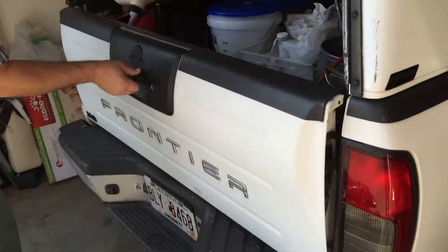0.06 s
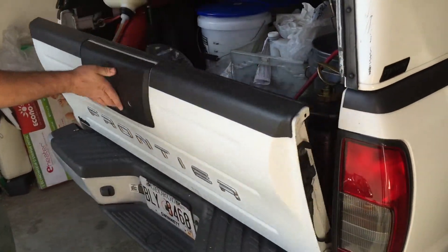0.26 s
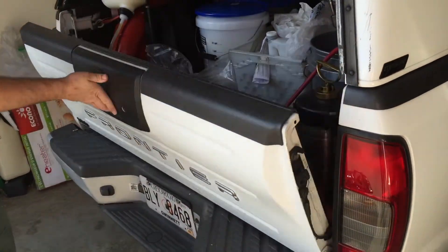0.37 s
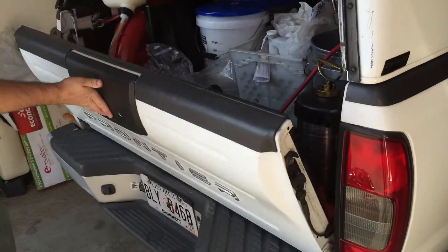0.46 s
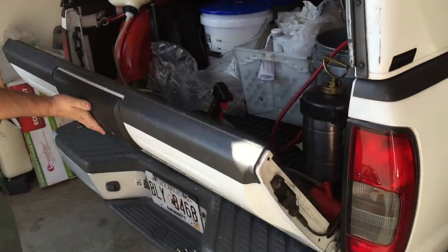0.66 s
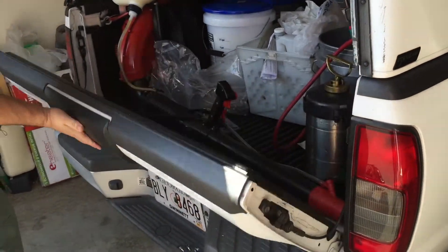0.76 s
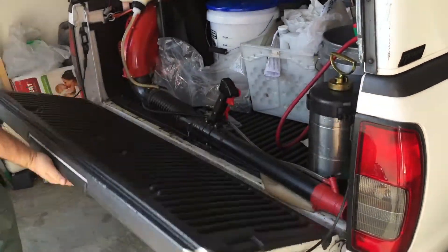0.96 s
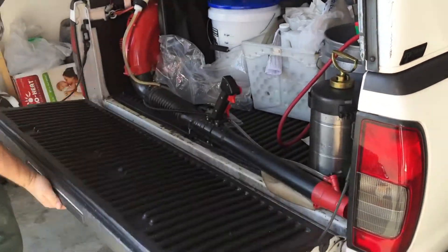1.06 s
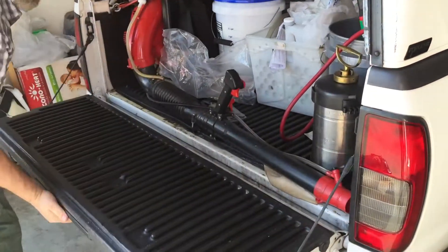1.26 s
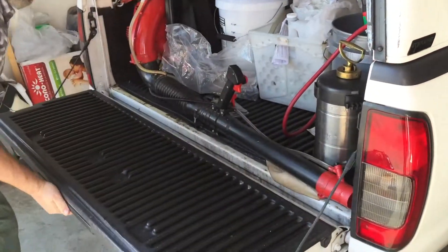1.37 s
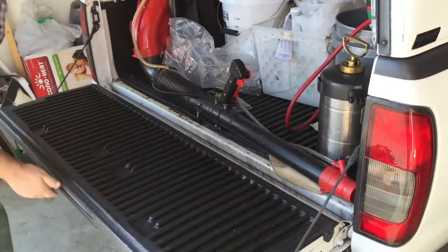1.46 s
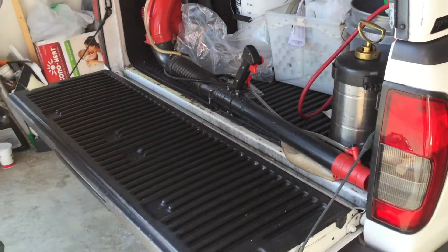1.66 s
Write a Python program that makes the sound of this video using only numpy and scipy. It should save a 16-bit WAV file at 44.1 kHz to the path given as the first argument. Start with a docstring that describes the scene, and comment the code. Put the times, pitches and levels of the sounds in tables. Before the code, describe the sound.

A pickup tailgate opens close by in a quiet garage. Soft handle clicks lead to a sharp steel latch snap at 0.2 seconds, followed by a brief hollow ring. The gate swings down with a very faint hiss. At about 1.2 seconds it lands with a heavy, hollow double clunk, loose parts rattling as it bounces. Smaller knocks die away by about 1.6 seconds.

```python
"""Opening a pickup's tailgate

Close by in a garage, the handle pulls its rods, the steel latch snaps open and the freed gate shudders.
It swings down with a faint hiss and lands on its cables with a double clunk: the hollow panel
booms and bounces, loose parts rattle, the cable ends tick and the truck rocks on its springs."""
import sys
import numpy as np
from scipy import signal
from scipy.fft import rfft, irfft
from scipy.io import wavfile

SR = 44100
rng = np.random.default_rng(int(sys.argv[2]) if len(sys.argv) > 2 else 0)


def transcribe(signal):
    """Save signal, clipped to [-1, 1], as a 16-bit WAV file at the path in sys.argv[1]."""
    frames = np.atleast_2d(signal).T
    limited = np.clip(frames, -1, 1)
    pcm = np.round(limited * 32767).astype(np.int16)
    wavfile.write(sys.argv[1], SR, pcm)


N = 74970
T = np.arange(N) / SR

# Levels are relative. A "colour" says how strong each pitch is in a noise. A "fade" is the time
# to die away by 60 dB. A "tilt" makes a sound brighter (+) or duller (-).

# the gate lands and bounces: t/s, boom level/dB, tilt of the panel's notes/dB per octave, rattle level/dB
GATE_BLOWS = [(1.124, -50, 2, -17.5), (1.1768, 4, -2.5, 0), (1.1978, 0.5, -7.5, 1), (1.2146, -9, 9, -8),
              (1.2668, -6.5, 0.5, -11.5), (1.297, -10, 2, -11), (1.32, -16, -4.5, -14.5),
              (1.343, -19, -14.5, -30), (1.462, -25.5, -2, -30), (1.581, -43.5, -4, -29)]
# notes of the hollow steel panel: f/Hz, level/dB, fade/s
PANEL_NOTES = [(123, -36, .28), (138, -30, .3), (187, -19, .22), (204, -32, .24), (234, -35, .24),
               (264, -27, .27), (312, -28, .25), (367, -27, .24), (396, -32, .24), (432, -29, .26),
               (472, -31, .24), (518, -31, .19), (541, -31, .2)]
# the panel's low rumble: f/Hz, level/dB
RUMBLE_COLOUR = [(30, -29), (70, -17), (105, -11.5), (170, -2), (300, -2), (520, -8.5), (650, -27),
                 (800, -26.5), (1200, -25), (3000, -42)]
# how long it rumbles: f/Hz, fade/s
RUMBLE_FADE = [(60, 0.16), (200, 0.21), (700, 0.04)]
# loose parts inside the gate: f/Hz, level/dB
RATTLE_COLOUR = [(200, -22), (600, 11), (720, 6.5), (870, 2), (1300, 5), (1900, -1.5), (3000, -2),
                 (5000, -11.5), (10000, -11), (13000, -21), (15000, -23)]
# how long they rattle: f/Hz, fade/s
RATTLE_FADE = [(500, 0.15), (2000, .17), (6000, 0.28), (13000, 0.21)]
def gate_landing():
    """Each blow rattles the loose parts; a moment later the hollow panel gives way and booms."""
    give_way = 1 - np.exp(-T / .0012)
    boom_lag_s, out = 0.0023, 0
    for start, boom_db, tilt, rattle_db in GATE_BLOWS:
        rattle = amp(-34.5) * burst(RATTLE_COLOUR, RATTLE_FADE, echo_db=-4)
        notes = amp(-6) * give_way * ring(PANEL_NOTES, thud=True, tilt_db=tilt)
        rumble = amp(-29.5) * burst(RUMBLE_COLOUR, RUMBLE_FADE, echo_db=-6)
        out += amp(rattle_db) * at(start, rattle)
        out += amp(boom_db) * at(start + boom_lag_s, notes + rumble)
    return low_cut(out, hz=159, order=3)


# clicks of the handle and latch: t/s, level/dB, tilt of the crack/dB per octave
LATCH_CLICKS = [(0.145, -38, 2), (0.1522, -25, 2), (0.173, -27, -3), (0.218, -28.5, -3), (0.2248, 1, 1)]
# notes of the steel latch parts: f/Hz, level/dB, fade/s
LATCH_NOTES = [(880, -24, .13), (1222, -25, .14), (2804, -25, .12), (2884, -21, .13), (3205, -20, .13),
               (3463, -20, .13), (4226, -26, .12), (4458, -30, .14), (4925, -22, .11), (6748, -23, .1),
               (7420, -26, .1), (7815, -27, .12), (8399, -27, .12), (9346, -23, .11), (10200, -24, .09),
               (11635, -32, .12)]
# the noisy crack of a click: f/Hz, level/dB
CRACK_COLOUR = [(110, -11), (250, 1.5), (600, -1), (720, -3.5), (1000, 1.5), (1250, -1), (1900, -4.5),
                (2400, -6), (3100, 1), (4000, -4), (5800, -5.5), (7000, -3.5), (9000, -4), (11000, -3),
                (12500, -13.5), (15000, -9)]
# how long it lasts: f/Hz, fade/s
CRACK_FADE = [(200, .12), (1000, 0.13), (3000, 0.062), (12000, .05)]
def latch():
    """Each click cracks and rings the steel parts, which give off no bass; soft clicks are duller."""
    notes = amp(-7.5) * ring(LATCH_NOTES)
    treble_cut = signal.butter(8, 11400, fs=SR, output="sos")
    soft_below_db, out = -12, 0
    for start, db, tilt in LATCH_CLICKS:
        crack = amp(-15.5) * burst(CRACK_COLOUR, CRACK_FADE, echo_db=-11.5, tilt_db=tilt)
        click = at(start, notes + crack)
        if db < soft_below_db:
            click = signal.sosfilt(treble_cut, click)
        out += amp(db) * click
    return low_cut(out, hz=180, order=3)


# notes of the gate's shaking skin: f/Hz, level/dB, fade/s
SHUDDER_NOTES = [(162.4, -53.5, 1), (212, -43, .55), (258, -29.5, 0.24), (297, -44.5, 0.99),
                 (344, -38.5, 0.53), (428, -31.5, 0.35)]
def shudder():
    """The freed gate jumps off its stops, and a hollow ring swells just after the latch lets go."""
    swell = 1 - np.exp(-T / 0.015)
    return at(.24, amp(-3.5) * swell * ring(SHUDDER_NOTES))


# ticks of the cable ends: t/s, level/dB, tilt/dB per octave
CABLE_TICKS = [(1.1737, -52, 3), (1.196, -35, -2), (1.201, -29.5, -3), (1.298, -48, 2.5)]
# one bright tick: f/Hz, level/dB
TICK_COLOUR = [(1000, -22), (3500, -8.5), (7000, 3.5), (11000, -1), (12500, -1.5), (15000, -11)]
# how long it lasts: f/Hz, fade/s
TICK_FADE = [(1000, 0.04), (12000, 0.069)]
def cable_ticks():
    """The cable ends give short, bright ticks as they catch the gate."""
    return sum(at(start, amp(db) * burst(TICK_COLOUR, TICK_FADE, echo_db=-25, tilt_db=tilt))
               for start, db, tilt in CABLE_TICKS)


# how loudly the rods and cables scrape: t/s, level/dB
SCRAPE_LOUDNESS = [(0.145, -65.5), (0.156, -48.5), (0.175, -47), (0.187, -46.5), (0.2, -41.5), (0.218, -42),
                   (0.235, -72), (0.26, -95.5), (1.1, -66), (1.135, -71), (1.158, -52), (1.18, -45),
                   (1.22, -90)]
# their dull tone: f/Hz, level/dB
SCRAPE_COLOUR = [(80, -39.5), (180, -4), (290, 7), (480, 3), (700, -6.5), (1200, -7.5), (2000, -28.5),
                 (6000, -32.5)]
def scrape():
    """The handle's rods scrape, and later the cables do as they pull tight."""
    return loudness(SCRAPE_LOUDNESS) * noise(SCRAPE_COLOUR)


# how strongly the truck rocks: t/s, level/dB
ROCK_LOUDNESS = [(1.12, -95), (1.18, -64.5), (1.255, -62), (1.285, -50), (1.35, -60), (1.42, -81),
                 (1.5, -81)]
# its deep tone: f/Hz, level/dB
ROCK_COLOUR = [(15, -5), (30, -3.5), (55, 4), (90, -11.5), (200, -40)]
def truck_rocking():
    """The truck rocks on its springs with a deep rumble as the gate lands."""
    return loudness(ROCK_LOUDNESS) * noise(ROCK_COLOUR)


# rise and fall of the swing's hiss: t/s, level/dB
HISS_LOUDNESS = [(0, -68), (.55, -71), (.75, -72), (.92, -63), (1.11, -60), (1.28, -74), (1.43, -63),
                 (1.53, -67), (1.63, -63), (1.7, -69)]
# its bright tone: f/Hz, level/dB
HISS_COLOUR = [(500, -3.5), (2500, -4.5), (5000, -4), (9500, 4.5), (13000, -2), (15000, 0)]
def swing_hiss():
    """A faint hiss grows as the gate swings."""
    return loudness(HISS_LOUDNESS) * noise(HISS_COLOUR)


# rise and fall of the mid-pitched hiss: t/s, level/dB
MID_HISS_LOUDNESS = [(.6, -86.5), (.83, -71), (.93, -69.5), (1.02, -89), (1.15, -106)]
# its tone: f/Hz, level/dB
MID_HISS_COLOUR = [(800, -19.5), (1800, -0.5), (2800, -2), (4500, -10.5), (9000, -18)]
def swing_mid_hiss():
    """A soft mid-pitched hiss swells and fades midway through the swing."""
    return loudness(MID_HISS_LOUDNESS) * noise(MID_HISS_COLOUR)


# the garage's air: f/Hz, level/dB
AIR_COLOUR = [(25, -22.5), (50, -16), (90, -4.5), (160, 1.5), (300, 0), (600, -6), (1200, -7.5),
              (2500, -19.5), (6000, -23.5), (15000, -34.5)]
def garage_air():
    """The air makes a low, steady hush."""
    return amp(-64) * noise(AIR_COLOUR)


# how long the garage echoes: f/Hz, fade/s
ECHO_FADE = [(100, 0.61), (300, 0.44), (1000, 0.42), (3500, 0.43), (7000, 0.33), (13000, 0.24)]
def garage_echo(t, hz, db):
    """Strength of the echo at one pitch: it builds quickly, dies away, and is weaker in the treble."""
    build_up = 1 - np.exp(-t / 0.016)
    tilt_db = -2.33 * np.log2(hz / 2000)
    return build_up * amp(db + tilt_db - 60 * t / at_hz(ECHO_FADE, hz))


def burst(colour, fades, echo_db, tilt_db=0):
    """Countless close notes struck at once: each band of pitches fades at its own rate and echoes."""
    t = T[:2 ** 15]
    hz = np.fft.rfftfreq(len(t), 1 / SR)
    edges = np.append(20, np.geomspace(100, 17000, 23))
    gain = amp(at_hz(colour, hz))
    spectrum, out = gain * rfft(rng.standard_normal(len(t))), 0
    for low, high in zip(edges, edges[1:]):
        inside, middle = (hz >= low) & (hz < high), np.sqrt(low * high)
        band = np.fft.ifft(spectrum * inside, len(t))
        band = band.real / (np.abs(band) + band.std() / 2)  # even out the random flutter
        share = np.sqrt(np.sum(gain[inside] ** 2) / np.sum(gain ** 2))
        tilt = amp(tilt_db * np.log2(middle / 2000))
        direct = amp(-60 * t / at_hz(fades, middle))
        echo = garage_echo(t, middle, echo_db)
        out += band / band.std() * share * tilt * np.hypot(direct, echo)
    return at(0, out)


def ring(notes, thud=False, tilt_db=0):
    """Fading notes of a struck object; if all start by pushing the same way, they open with a thud."""
    out = 0
    for k, (hz, db, fade) in enumerate(notes):
        direction = 1 if thud else (-1) ** k
        start_db = db + tilt_db * np.log2(hz / 253)  # tilt around the panel's middle pitch
        out += direction * np.sin(2 * np.pi * hz * T) * amp(start_db - 60 * T / fade)
    return out


def noise(colour):
    """Steady noise of a given colour, with a typical size of 1."""
    gain = amp(at_hz(colour, np.fft.rfftfreq(N, 1 / SR)))
    x = irfft(rfft(rng.standard_normal(N)) * gain, N)
    return x / x.std()


def amp(db):
    """Turn decibels into a number to multiply by."""
    return 10 ** (np.asarray(db) / 20)


def at_hz(points, hz):
    """Read a table at any pitch, with octaves evenly spaced."""
    f, values = np.transpose(points)
    return np.interp(np.log(hz + 1e-3), np.log(f), values)


def loudness(points):
    """Join points in dB into a volume curve over time."""
    return amp(np.interp(T, *np.transpose(points)))


def at(start, sound):
    """Start a sound at a time in seconds, with silence around it."""
    return np.pad(sound, (int(start * SR), N))[:N]


def low_cut(x, hz, order=2):
    """Take away the bass."""
    return signal.sosfilt(signal.butter(order, hz, "high", fs=SR, output="sos"), x)


def scene():
    """Latch, swing and landing over the quiet air of the garage, in one channel."""
    knocks = latch() + shudder() + gate_landing() + cable_ticks()
    movement = scrape() + swing_hiss() + swing_mid_hiss() + truck_rocking()
    return (knocks + movement + garage_air())[None]


def record(dry):
    """The microphone loses the deepest bass; the highest treble is cut steeply."""
    treble_cut = signal.ellip(10, .2, 70, 15400, fs=SR, output="sos")
    return signal.sosfilt(treble_cut, low_cut(dry, hz=51))


dry = scene()
out = record(dry)
transcribe(out)
```